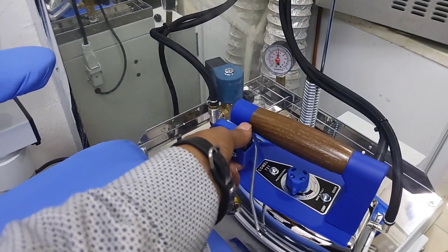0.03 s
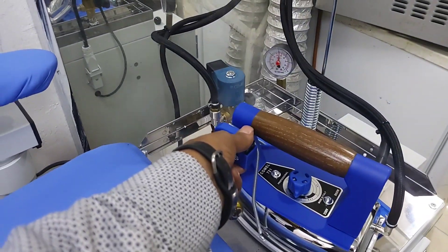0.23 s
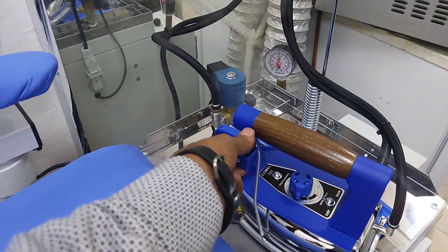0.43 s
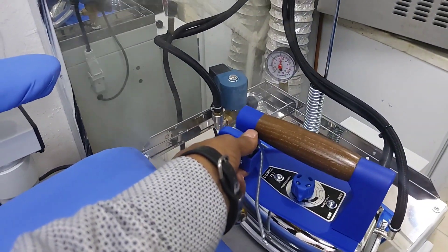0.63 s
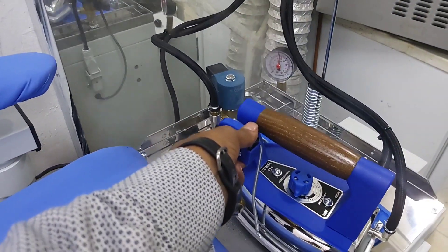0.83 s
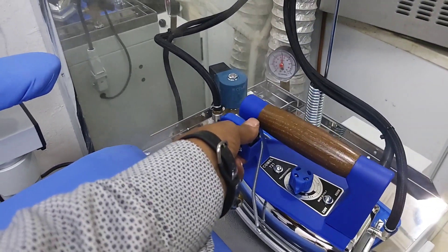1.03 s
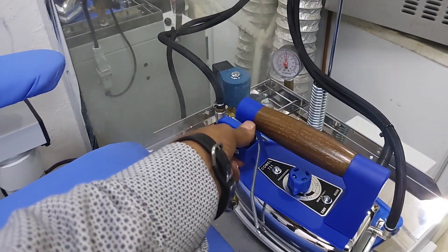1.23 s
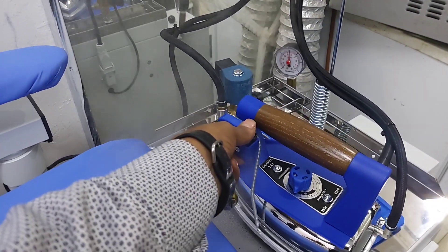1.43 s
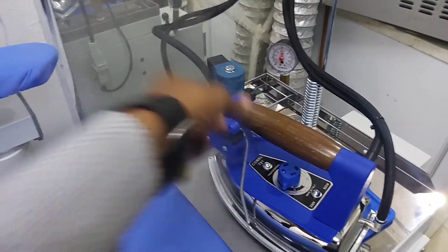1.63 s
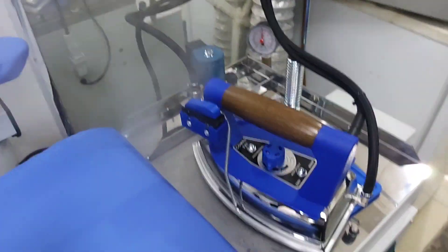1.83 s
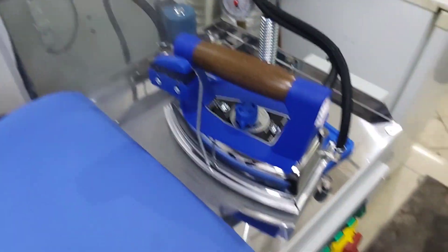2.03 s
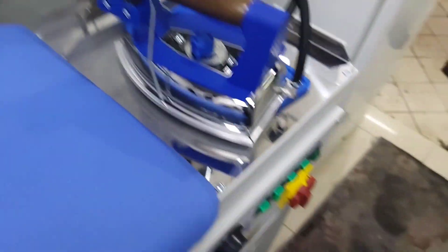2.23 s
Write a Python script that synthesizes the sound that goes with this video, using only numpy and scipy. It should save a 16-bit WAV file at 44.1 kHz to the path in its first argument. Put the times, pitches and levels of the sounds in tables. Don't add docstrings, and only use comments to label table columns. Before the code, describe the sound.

Close, loud steam hiss from an industrial iron, fizzing and wet at first, then drier and slightly weaker, stops quickly; soft lever and hose knocks follow over low motor hum in a small hard workshop.

```python
import sys
import numpy as np
from scipy import signal
from scipy.fft import irfft
from scipy.io import wavfile
from scipy.ndimage import uniform_filter1d

SR = 44100
rng = np.random.default_rng(int(sys.argv[2]) if len(sys.argv) > 2 else 0)


def how_loud(loudness_db):
    steps = np.asarray(loudness_db, float) / 20
    return 10 ** steps


def master_out(mix):
    frames = np.transpose(np.atleast_2d(mix))
    ceiling = np.clip(frames, -1, 1)
    pcm = np.round(ceiling * 32767).astype(np.int16)
    wavfile.write(sys.argv[1], SR, pcm)


N = 101297
LEAD = SR // 2
SHUT_S = 1.651


def evened(x):
    return x / np.sqrt(np.mean(np.abs(x) ** 2) + 1e-20)


def read(points, hz):
    f, value = np.transpose(points)
    return np.interp(np.log(hz + 1), np.log(f + 1), value)


def blurred(shape, rows, cols):
    field = uniform_filter1d(rng.standard_normal(shape), rows, 0)
    return evened(uniform_filter1d(field, cols, 1))


def pair(z, likeness):
    c = np.clip(likeness, -1, 1)[:, None]
    return np.array([z[0], c * z[0] + np.sqrt(1 - c ** 2) * z[1]])


def turbulence():
    shape = (2, N + LEAD)
    spits_per_s, spit_db = 1100, -20
    size = how_loud(2.1 * np.minimum(rng.exponential(1, shape), 5))
    spits = size * (rng.random(shape) < spits_per_s / SR) * rng.choice([-1., 1.], shape)
    return rng.standard_normal(shape) + how_loud(spit_db) * evened(spits)


# (frequency [Hz], density [dB per Hz])
WET_STEAM = [(200, -49), (500, -22.5), (1000, -16), (1600, -7), (3200, -6), (6900, -7.5), (9000, -17.5),
             (15800, -25.5)]
# (frequency [Hz], density [dB per Hz])
DRY_STEAM = [(200, -42), (500, -20.5), (1050, -17), (1600, -9.5), (2600, -8.5), (5300, -7), (8000, -13),
             (15800, -20)]
# (frequency [Hz], width [Hz], wet height [dB], dry height [dB])
CHANNEL_RINGS = [(1558, 52, 2.5, 4.5), (1965, 59, 4.5, 10.5), (2086, 62, 6.5, 5.5), (2482, 85, 10, 11),
                 (3140, 77, 13, 8.5), (3235, 60, 5.5, -6), (3313, 110, 2.5, 8.5), (3610, 140, 6, -0.5),
                 (4005, 150, 3, 8), (4176, 107, 6, 8.5), (5124, 100, 7.5, 9), (5335, 97, 5, 2.5),
                 (5650, 60, -0.5, 1.5), (6460, 150, -0.5, -3)]
# (frequency [Hz], width [Hz], wet height [dB], dry height [dB])
REST_HUMPS = [(2860, 160, 1.5, -1), (4370, 220, 0.5, 1), (4930, 300, 1.5, -2.5), (5530, 500, 0, 2),
              (2130, 500, -1, 1.5), (5905, 270, -2, -5), (7140, 570, 4.5, 5.5), (7460, 250, -15.5, -7),
              (8770, 710, 8, -0.5), (10020, 790, 3.5, 4.5)]


def steam_colour(hz, t):
    hz = hz[:, None]
    wander, waxing = .003, .1
    dries_from_s, dries_to_s = .68, .95
    wet_db, dry_db = read(WET_STEAM, hz), read(DRY_STEAM, hz)
    edge = np.exp(-5 * np.maximum(t - SHUT_S, 0))
    for f, width, at_wet_db, at_dry_db in CHANNEL_RINGS + REST_HUMPS:
        drift, wax = blurred((2, len(t)), 1, 20)
        offset = (hz - f * (1 + wander * drift)) / width
        bump = (1 + waxing * wax) * edge / (1 + (2 * offset) ** 2)
        wet_db = wet_db + at_wet_db * bump
        dry_db = dry_db + at_dry_db * bump
    blowing = t < SHUT_S
    wet = how_loud(wet_db) / np.sqrt(np.mean(how_loud(wet_db[:, blowing]) ** 2))
    dried = how_loud(dry_db) / np.sqrt(np.mean(how_loud(dry_db[:, blowing]) ** 2))
    dryness = np.clip((t - dries_from_s) / (dries_to_s - dries_from_s), 0, 1)
    return wet ** (1 - dryness) * dried ** dryness


def bleed_db(hz, t):
    shut = np.maximum(t - SHUT_S, 0)
    treble_first = ((hz[:, None] + 200) / 4000) ** 0.41
    return 113 * shut * (1 + 0.72 * shut) * treble_first


# (time [s], level [dB], extra fizz [dB])
JET_FLOW = [
    (0, -17, 7),
    (0.352, -16.5, 5),
    (0.689, -17, 8),
    (0.821, -17.5, 3.5),
    (.93, -20, 5.5),
    (1.099, -19, 0.5),
    (1.2, -20, 0.3),
    (1.63, -19, 1),
]
# (frequency [Hz], level [dB])
SECOND_ROW = [(300, -5), (1000, -1.5), (3500, -2), (12000, -1)]


def jets():
    hz, t, z = signal.stft(turbulence(), SR, nperseg=1024, noverlap=896)
    t = t - LEAD / SR
    s, flow_db, fizz_db = np.transpose(JET_FLOW)
    above_fizz = 1 / (1 + (9500 / (hz[:, None] + 1)) ** 6)
    level_db = np.interp(t, s, flow_db) + np.interp(t, s, fizz_db) * above_fizz
    patches_db = 0.79 * blurred((len(hz), len(t)), 12, 24)
    swell_db = .4 * blurred((1, len(t)), 1, 40)
    z = z * steam_colour(hz, t) * how_loud(level_db + patches_db + swell_db - bleed_db(hz, t))
    z[1] *= how_loud(read(SECOND_ROW, hz))[:, None]
    steam = signal.istft(z, SR, nperseg=1024, noverlap=896)[1][:, :N + LEAD]
    flicker_db = 1.61 * blurred((2, N + LEAD), 1, 500)
    return steam * how_loud(flicker_db)


# (frequency [Hz], time to fall 60 dB [s])
ROOM_T60 = [(300, .36), (2000, .33), (6000, .28), (14000, .22)]
# (frequency [Hz], likeness [-1 to 1])
TAIL_ALIKE = [(100, 1), (500, .75), (1400, .5), (3000, 0.015), (15000, 0.1)]
# (frequency [Hz], scatter [rad])
NEAR_SCATTER = [(500, .25), (1500, .4), (3000, .4), (7000, .45), (9000, 1.6)]
# (frequency [Hz], phase [rad])
PORT_TURN = [(400, 0.67), (1000, -1.5), (2500, 0.47), (3100, -0.7), (4500, -0.71), (5100, 0), (7000, 0.6),
             (12000, 3)]


def room(x):
    room_db = -5.5
    hz, t, z = signal.stft(rng.standard_normal((2, SR // 2 + SR // 4)), SR, nperseg=256)
    decay_db = -60 * t / read(ROOM_T60, hz)[:, None]
    tail = signal.istft(pair(z, read(TAIL_ALIKE, hz)) * how_loud(decay_db), SR, nperseg=256)[1]
    tail = how_loud(room_db) * tail / np.linalg.norm(tail[0])
    tail = np.pad(tail, ((0, 0), (300, 0)))
    bins = np.fft.rfftfreq(512, 1 / SR)
    twist = blurred((2, 257), 1, 10) * read(NEAR_SCATTER, bins)
    twist = twist + [[0], [1]] * read(PORT_TURN, bins)
    near = np.roll(irfft(np.exp(1j * twist)), 256, 1)
    near = np.pad(near, ((0, 0), (0, tail.shape[1] - 512)))
    response = (near + tail) / np.sqrt(1 + how_loud(2 * room_db))
    return signal.fftconvolve(x[None], response, axes=1)[:, LEAD + 256:][:, :N]


# (frequency [Hz], density [dB per Hz])
WASH_SPECTRUM = [(30, -39.5), (44, -19), (120, -9), (430, -9), (640, -18), (1100, -13.5), (4000, -31),
                 (15800, -50.5)]
# (frequency [Hz], likeness [-1 to 1])
WASH_ALIKE = [(60, 0.99), (180, 0.93), (550, 0.72), (1650, -0.5), (4970, 0.59), (15000, 0.1)]


def wash():
    hz, t, z = signal.stft(rng.standard_normal((2, N)), SR, nperseg=2048, noverlap=1536)
    patches_db = 2.1 * blurred(z[0].shape, 8, 5)
    z = pair(z, read(WASH_ALIKE, hz)) * how_loud(read(WASH_SPECTRUM, hz)[:, None] + patches_db)
    noise = signal.istft(z, SR, nperseg=2048, noverlap=1536)[1][:, :N]
    return how_loud(-44.5) * evened(noise)


# (multiple of shaft rate, rms level [dB])
SHAFT_ORDERS = [(1, -60), (2.75, -61), (6, -55), (20, -56), (21, -58.5), (22, -64), (25, -62), (33.4, -67),
                (35.3, -70), (246, -89)]


def motor():
    shaft_hz = 48.9
    order, db = np.transpose(SHAFT_ORDERS)[:, :, None]
    waver_db = 1.5 * blurred((len(db), N), 1, 1500)
    turns = shaft_hz * np.arange(N) / SR
    tones = np.sin(2 * np.pi * (order * turns + rng.random(db.shape)))
    return np.sqrt(2) * (how_loud(db + waver_db) * tones).sum(0)


# (time [s], length [s], level [dB], frequency [Hz], width [Hz])
LEVER_AND_HOSE = [(0, 0.67, -47.5, 128, 67), (1.9, 0.027, -36, 860, 160), (1.755, 0.038, -38, 560, 250),
                  (1.7, 0.025, -35, 1430, 250), (1.86, 0.026, -29.5, 1250, 150),
                  (1.74, 0.05, -39, 2700, 180), (1.8, 0.082, -37, 2300, 200),
                  (1.845, 0.071, -45.5, 2880, 300), (1.81, 0.17, -46, 880, 220),
                  (2.2, 0.058, -38.5, 410, 180), (1.7, 0.11, -46.5, 560, 350), (2.5, 0.047, -52, 400, 120)]


def knocks():
    t = np.arange(N + LEAD) / SR - LEAD / SR
    out = 0
    for s, length, db, hz, width in LEVER_AND_HOSE:
        r = np.exp(-np.pi * width / SR)
        poles = [1, -2 * r * np.cos(2 * np.pi * hz / SR), r * r]
        rub = signal.lfilter([1, -1], poles, rng.standard_normal(len(t)))
        ring = evened(signal.lfilter([1], poles, rub))
        swell = np.sin(np.pi * np.clip((t - s) / length, 0, 1) ** 0.36)
        out = out + how_loud(db) * ring * swell
    return out


def scene():
    first_row, second_row = jets()
    return room(first_row + knocks()) + room(second_row) + wash() + motor()


def low_pass(x):
    return signal.sosfilt(signal.butter(12, 15900, fs=SR, output="sos"), x)


def record(dry):
    lag, ceiling, edge_hz = 2, 1.1, 15730
    ports = np.array([dry[0], np.pad(dry[1], (lag, 0), "reflect")[:N]])
    ports = ceiling * np.tanh(ports / ceiling)
    edge = signal.firwin(1023, edge_hz, window=("kaiser", 9), fs=SR)
    mix = signal.oaconvolve(ports, edge[None], "same")
    return low_pass(mix)


dry = scene()
out = record(dry)
master_out(out)
```